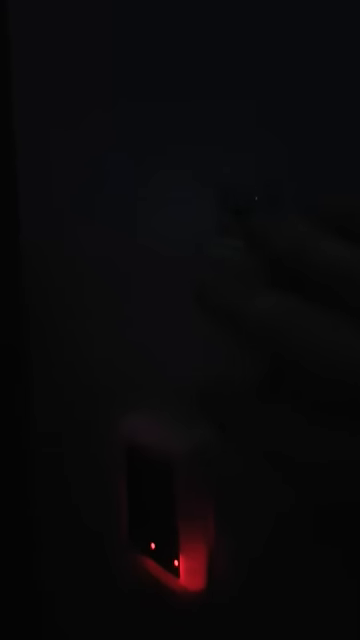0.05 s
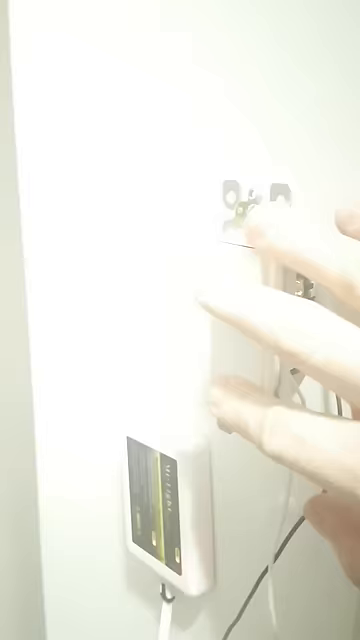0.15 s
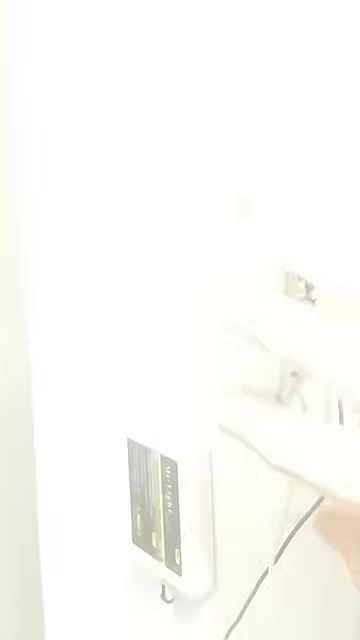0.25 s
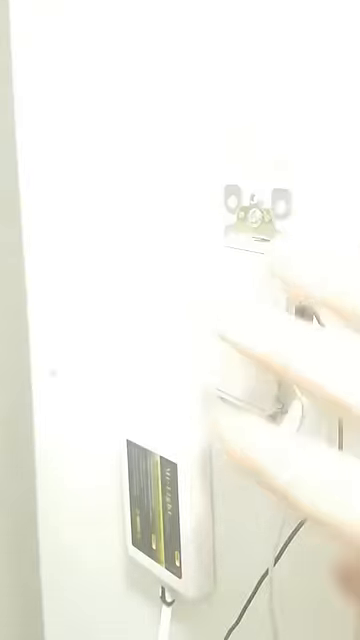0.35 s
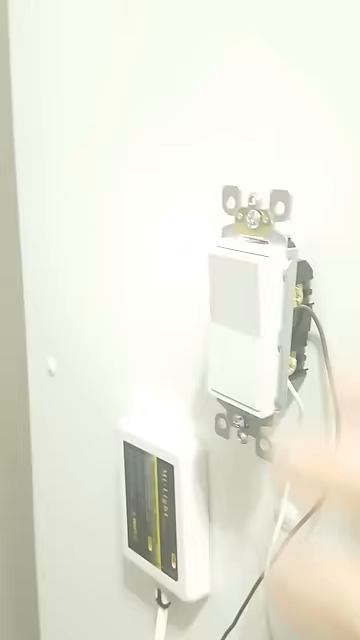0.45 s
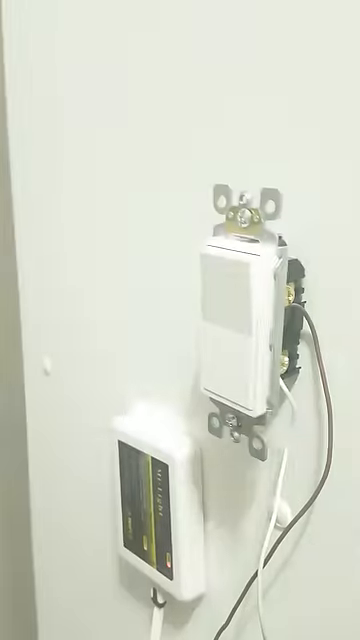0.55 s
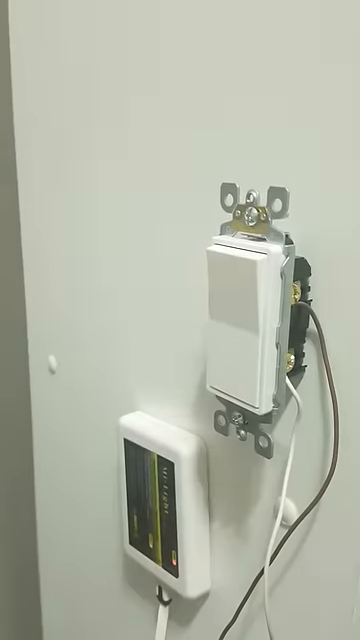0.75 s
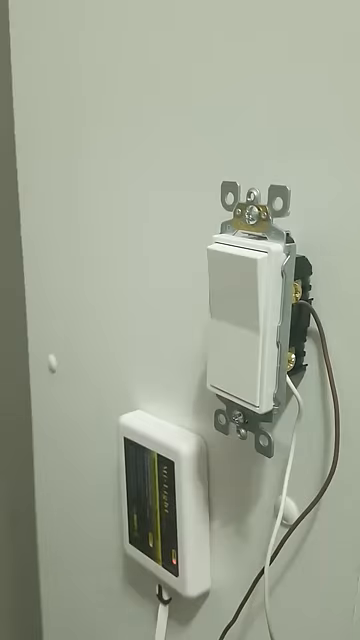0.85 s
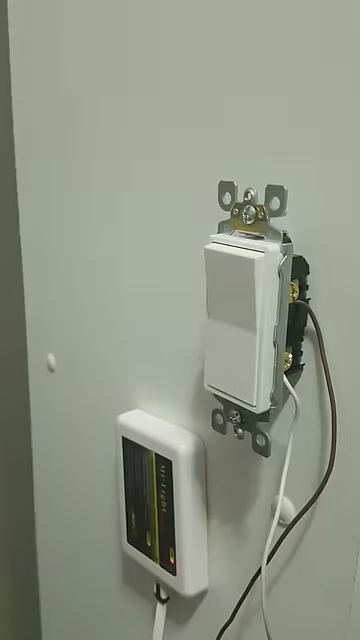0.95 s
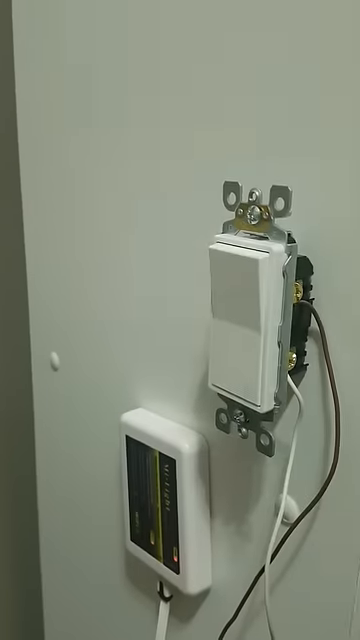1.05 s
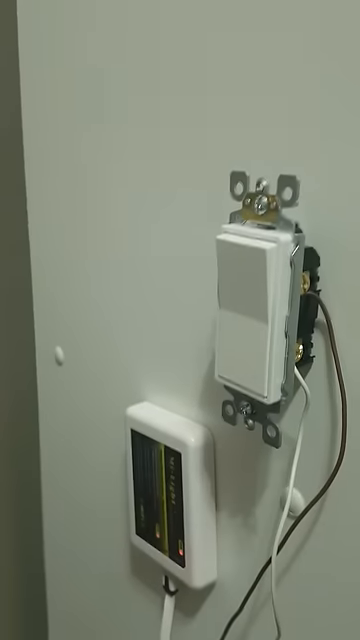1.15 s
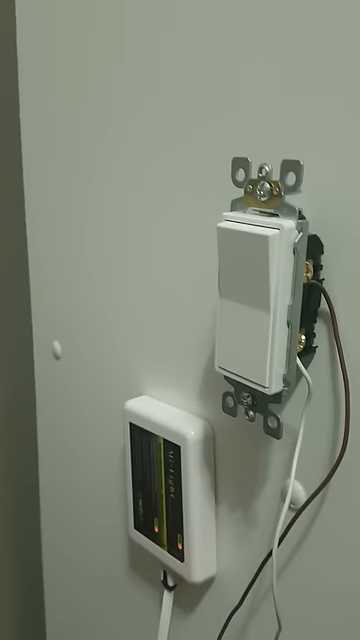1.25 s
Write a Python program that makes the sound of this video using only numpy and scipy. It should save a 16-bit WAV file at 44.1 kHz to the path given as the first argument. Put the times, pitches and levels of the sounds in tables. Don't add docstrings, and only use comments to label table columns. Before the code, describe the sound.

Sharp plastic switch click, followed by dry skin rubs and a dull knock, in a quiet room.

```python
import sys
import numpy as np
from scipy import signal
from scipy.fft import rfft, irfft
from scipy.io import wavfile
from scipy.ndimage import uniform_filter1d

SR = 44100
rng = np.random.default_rng(int(sys.argv[2]) if len(sys.argv) > 2 else 0)


def makeup_ratio(level_db):
    decades = np.asarray(level_db, float) / 20
    return 10 ** decades


def file_out(sig):
    cols = np.atleast_2d(sig).T
    lim = np.clip(cols, -1, 1)
    pcm = np.round(lim * 32767).astype(np.int16)
    wavfile.write(sys.argv[1], SR, pcm)


N = 57330
T = np.arange(N) / SR
PORT_LAG_S, ALIKE_BELOW_HZ = 0.00033, 650


def band(x, hz, width):
    return signal.lfilter(*signal.iirpeak(hz, hz / width, fs=SR), x)


def band_twice(x, hz, width):
    return band(band(x, hz, width), hz, width)


def unit(x):
    return x / np.sqrt(np.mean(x ** 2))


def colour(x, points, size=4096):
    hz, gain_db = np.array(points, float).T
    bins_hz = np.arange(size // 2 + 1) * SR / size
    db = np.interp(np.log(bins_hz + 1), np.log(hz), gain_db)
    cepstrum = irfft(np.log(makeup_ratio(db)))
    cepstrum[1:size // 2] *= 2
    cepstrum[size // 2 + 1:] = 0
    h = irfft(np.exp(rfft(cepstrum)))
    h = h / np.sqrt(h @ h)
    return signal.fftconvolve(x, np.atleast_2d(h), axes=1)[:, :N]


def ring(x, modes):
    t = T[:SR // 4]
    turns = rng.uniform(0, 2 * np.pi, (len(modes), 2, 1))
    h = 0
    for (hz, db, t60), turn in zip(modes, turns):
        phase = turn * min(hz / ALIKE_BELOW_HZ / 2, 1)
        h = h + makeup_ratio(db) * np.sin(2 * np.pi * hz * t + phase) * makeup_ratio(-60 * t / t60)
    h = h / np.sqrt(np.mean(np.sum(h ** 2, 1)))
    return signal.fftconvolve(x, h, axes=1)[:, :N]


def pair(spread_db=0):
    x = rng.standard_normal((3, N)) * makeup_ratio(spread_db * rng.exponential(1, (3, N)))
    low = signal.butter(1, ALIKE_BELOW_HZ, fs=SR)
    shared = signal.lfilter(*low, x[2])
    lagged = np.interp(T - PORT_LAG_S, T, shared)
    separate = x[:2] - signal.lfilter(*low, x[:2]) / 2
    return unit(separate + np.array([lagged, shared]))


def walk(rate_hz):
    k = int(SR / rate_hz)
    return unit(uniform_filter1d(uniform_filter1d(rng.standard_normal(N), k), k))


def burst(start, rise, fall):
    t = np.maximum(T - start, 0)
    return (1 - np.exp(-t / rise)) * np.exp(-t / fall)


def strikes(events):
    x = np.zeros((1, N))
    for s, db, *_ in events:
        x[0, int(s * SR)] = makeup_ratio(db)
    return x


def curve(points, column):
    table = np.array(points)
    return np.interp(T, table[:, 0], table[:, column])


def level_curve(points, column):
    table = np.array(points)
    return np.interp(T, table[:, 0], table[:, column], left=-150, right=-150)


# start [s], level [dB], chatter length [s].
SNAPS = [
    (.1938, -14.5, .0022),
    (.1958, -20, .004),
    (.1988, -26, .002),
]
# frequency [Hz], level [dB].
SNAP_COLOUR = [(120, -51.5), (250, -18), (700, -9), (2200, 0.5), (3100, 10.5), (5200, -1), (7000, 4),
               (14000, -6.5)]
# frequency [Hz], level [dB], 60 dB decay time [s].
HOUSING_MODES = [(218.2, -20.5, 0.049), (619.6, -15.5, 0.053), (796, -15.5, 0.051), (1270, -11, 0.013),
                 (1760, -17.5, 0.033), (2754, -15, 0.0288), (3116, -6.5, .03), (3693, -13, 0.022),
                 (3900, -19.5, 0.042), (5394, 1.5, 0.0074), (6480, -3.5, 0.036), (7380, 2.5, 0.0049),
                 (7974, -6, .01), (13200, -14.5, 0.0033)]


def switch():
    let_go_s, let_go_hz, let_go_db = .191, 3200, -51
    creep = np.clip((T - let_go_s) / (SNAPS[0][0] - let_go_s), 0, 1) * (T < SNAPS[1][0])
    let_go = makeup_ratio(let_go_db) * creep * unit(band_twice(pair(), let_go_hz, let_go_hz))
    force = sum(makeup_ratio(db) * burst(s, .0003, fall) for s, db, fall in SNAPS)
    chatter = colour(pair(spread_db=1.5) * force, SNAP_COLOUR)
    housing = makeup_ratio(15) * ring(strikes(SNAPS[:1]), HOUSING_MODES)
    return let_go + chatter + housing


# frequency [Hz], level [dB].
KNOCK_COLOUR = [(250, -22), (500, -10.5), (900, -3.5), (1400, 2), (2100, 1), (3000, 2), (4500, 2),
                (9000, -24)]
# frequency [Hz], level [dB], 60 dB decay time [s].
KNOCK_BODY = [(508, -7.5, 0.016), (929, -20.5, 0.039), (1060, -24, 0.098), (1290, -24, 0.021),
              (1670, -41, .03), (2129.3, 7.5, 0.033), (2330, -24, 0.059), (2660, -10.5, 0.088),
              (2850, -31, 0.022), (3450, -23, 0.024), (4537, -13, 0.09)]
# start [s], level [dB].
KNOCK_SLIPS = [
    (.2935, -32),
    (.2978, -31),
    (.3021, -31),
    (.3064, -34),
    (.3193, -37),
    (.3322, -37),
]


def knock():
    start_s, level_db, rise_s, fall_s = .2915, -27.5, 0.001, 0.033
    judder_hz, judder_db = 255, 2
    judder = makeup_ratio(judder_db * np.sin(2 * np.pi * judder_hz * (T - start_s - .0018)))
    force = pair(spread_db=1) * judder * makeup_ratio(level_db) * burst(start_s, rise_s, fall_s)
    body = makeup_ratio(19.5) * ring(strikes(KNOCK_SLIPS), KNOCK_BODY)
    return colour(force, KNOCK_COLOUR) + body


def rub(pressure, tone):
    db = level_curve(pressure, 1) + walk(72)
    return colour(pair(spread_db=1) * makeup_ratio(db), tone)


# time [s], level [dB].
RUB_1_PRESSURE = [
    (.215, -48),
    (.245, -47),
    (.275, -34),
    (.3, -36.5),
    (.33, -38.5),
    (.355, -48.5),
    (.385, -60),
]
# frequency [Hz], level [dB].
RUB_1_COLOUR = [(300, -9.5), (1400, -8), (3000, -4.5), (4300, -10.5), (6100, 5), (8500, 0.5), (12300, -11),
                (16000, -33.5)]


def first_rub():
    return rub(RUB_1_PRESSURE, RUB_1_COLOUR)


# time [s], level [dB].
RUB_2_PRESSURE = [
    (.396, -96),
    (.408, -48.5),
    (.43, -37),
    (.46, -49),
    (.5, -45.5),
    (.54, -59.5),
    (.575, -91),
]
# frequency [Hz], level [dB].
RUB_2_COLOUR = [(300, -17.5), (1000, -20), (2300, -8), (5000, -19.5), (6700, -13.5), (7400, -5.5),
                (8800, -8), (9600, -30)]


def second_rub():
    return rub(RUB_2_PRESSURE, RUB_2_COLOUR)


# time [s], level [dB].
BRUSH_PRESSURE = [
    (.392, -87),
    (.403, -58),
    (.425, -44.5),
    (.45, -56),
    (.5, -56),
    (.53, -73),
]
# frequency [Hz], level [dB].
BRUSH_COLOUR = [(5000, -16), (10000, -1.5), (12400, -3), (13500, -24), (16000, -19)]


def brush():
    return rub(BRUSH_PRESSURE, BRUSH_COLOUR)


# time [s], pitch [Hz], level [dB].
SQUEAK = [
    (.455, 1147, -59),
    (0.479, 1099, -56),
    (0.518, 847, -56),
    (.55, 906, -96),
]


def squeak():
    width_hz = 120
    turn = 2 * np.pi * np.cumsum(curve(SQUEAK, 1)) / SR
    a, b = uniform_filter1d(rng.standard_normal((2, 2, N)), int(SR / width_hz))
    return makeup_ratio(level_curve(SQUEAK, 2)) * unit(a * np.sin(turn) + b * np.cos(turn))


# band [Hz], 60 dB decay time [s], level re direct [dB].
ROOM = [(262, 0.2, 8.5), (756, 0.22, 4), (1852, 0.34, 2.5), (4215, 0.91, -6.5), (8340, 0.33, -7),
        (11000, 0.33, -14), (15210, 0.52, -23)]


def room(x):
    first_wall_s = 0.00418
    t = T[:SR // 2]
    tail = 0
    for hz, t60, db in ROOM:
        h = band_twice(pair(), hz, hz * 1.1)[:, :len(t)]
        h = h * makeup_ratio(-60 * t / t60) * (t > first_wall_s)
        tail = tail + h * makeup_ratio(db) * np.sqrt(hz / SR / np.mean(np.sum(h ** 2, 1)))
    return signal.fftconvolve(x[::-1], tail, axes=1)[:, :N]


# time [s], level [dB], frequency [Hz].
BUMPS = [(0.363, -46.5, 101), (0.437, -35.5, 264), (0.486, -47.5, 110), (0.613, -51, 123), (.632, -50, 190),
         (.82, -45, 138.5), (0.852, -45, 110), (0.987, -57.5, 197.6), (1.063, -44.5, 151),
         (1.16, -47.5, 193), (1.198, -51, 138.1), (1.28, -54.5, 79.5)]


def grip():
    hz, level_db, leak_db, bump_cycles = 110, -58, -33, 1.75
    rumble = band(band(rng.standard_normal(N), hz, hz * 2.28), hz, hz * 6.9)
    x = makeup_ratio(level_db + 4.4 * walk(19)) * unit(rumble)
    for s, db, bump_hz in BUMPS:
        cycles = (T - s) * bump_hz
        swell = np.exp(-(cycles / bump_cycles * 2) ** 2)
        x = x + makeup_ratio(db) * np.cos(2 * np.pi * cycles - .6) * swell
    return x * np.array([[makeup_ratio(leak_db)], [1]])


# frequency [Hz], level per Hz [dB].
AIR_COLOUR = [(18, -25.5), (30, -9.5), (48, -18.5), (161, -14.5), (584, -14), (1280, -21.5), (1760, -21),
              (5040, -32.5), (16000, -44)]
# frequency [Hz], width [Hz], level [dB].
HUM = [
    (591, 18, -70),
    (852, 8.3, -79),
    (1160, 14, -80),
]


def air():
    hum = 0
    for hz, width, db in HUM:
        hum = hum + makeup_ratio(db) * unit(band(rng.standard_normal(N), hz, width))
    return makeup_ratio(-62) * colour(pair(), AIR_COLOUR) + hum


def scene():
    near = switch() + knock() + first_rub() + second_rub() + brush() + squeak()
    near = signal.lfilter(*signal.butter(2, 170, "high", fs=SR), near)
    return near + room(near) + air() + grip()


def band_limit(x):
    return signal.sosfilt(signal.butter(12, 16780, fs=SR, output="sos"), x)


# frequency [Hz], level [dB].
MIC = [(30, 1), (7000, -5.5), (8600, -3), (10000, -1.5), (11500, 0), (13000, 9), (15700, 12), (16600, -46)]


def record(dry):
    mix = colour(dry, MIC) - .00042
    return band_limit(mix)


dry = scene()
out = record(dry)
file_out(out)
```